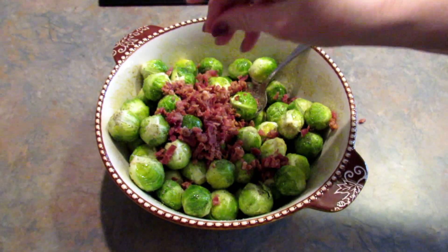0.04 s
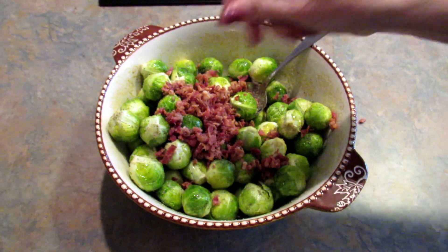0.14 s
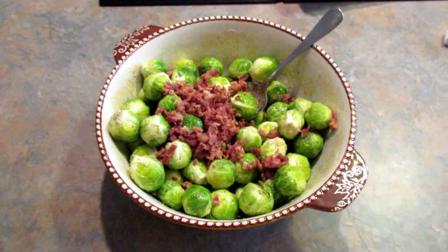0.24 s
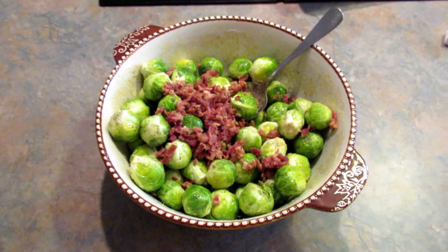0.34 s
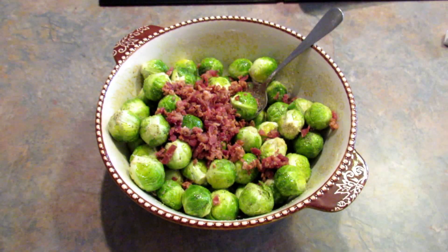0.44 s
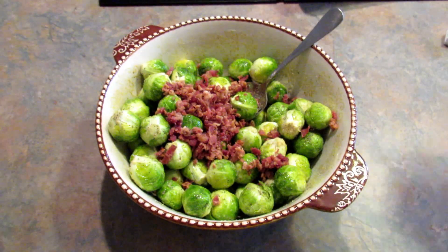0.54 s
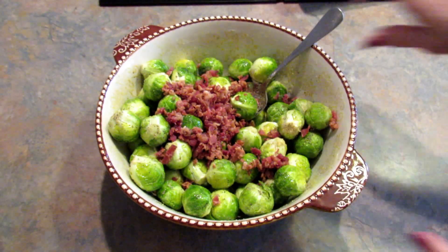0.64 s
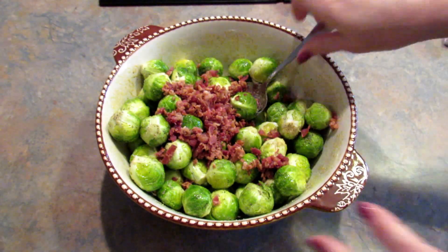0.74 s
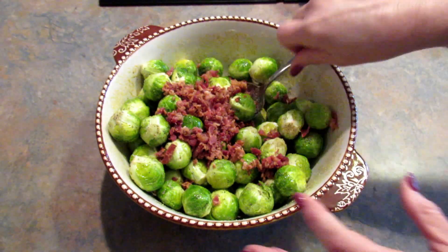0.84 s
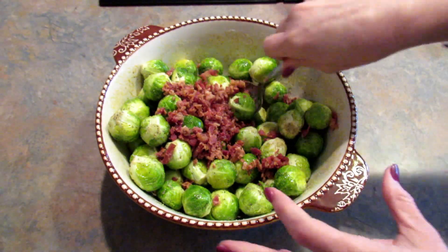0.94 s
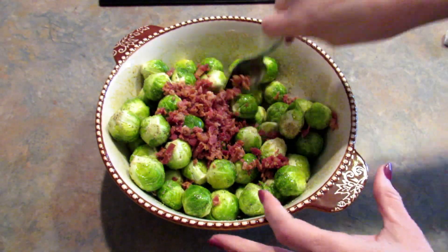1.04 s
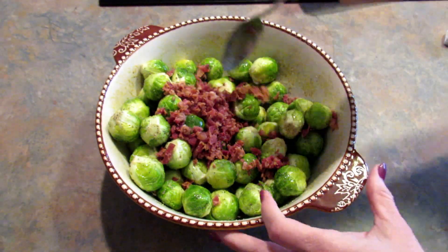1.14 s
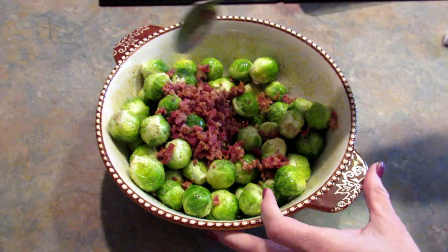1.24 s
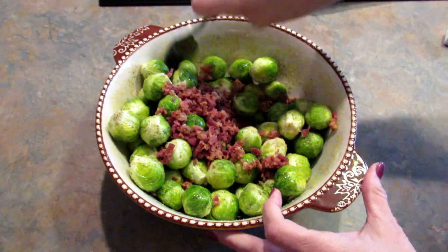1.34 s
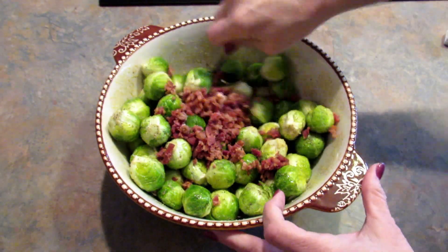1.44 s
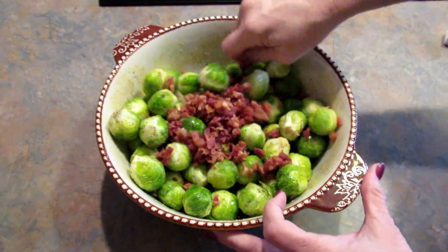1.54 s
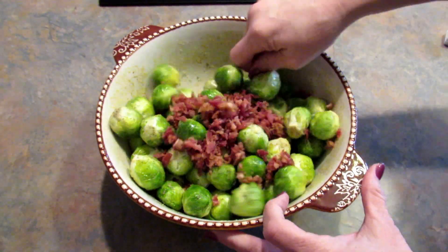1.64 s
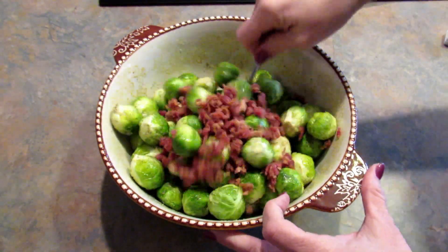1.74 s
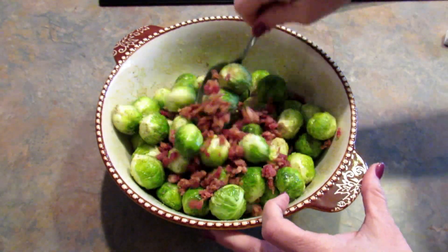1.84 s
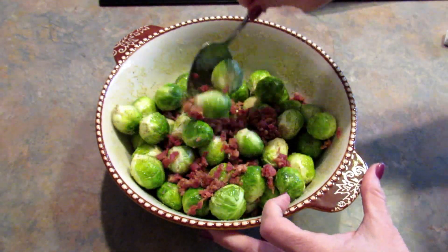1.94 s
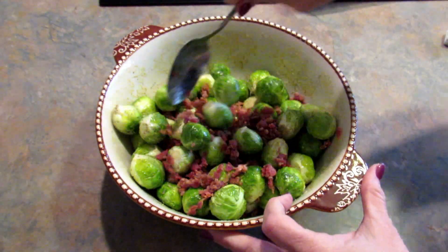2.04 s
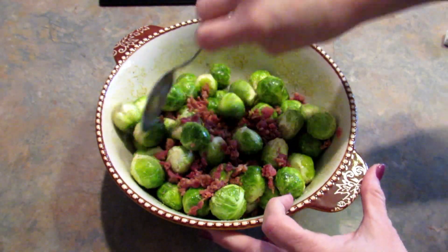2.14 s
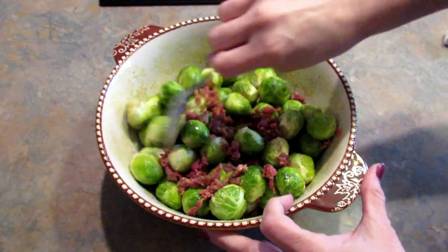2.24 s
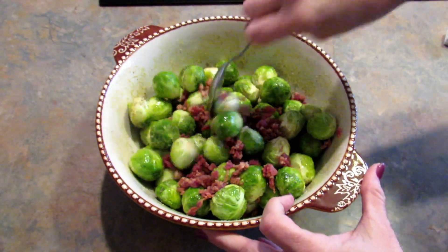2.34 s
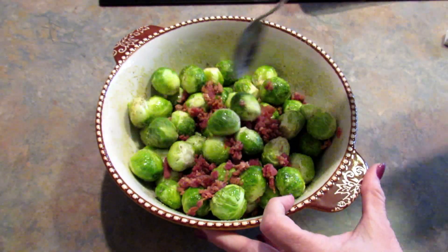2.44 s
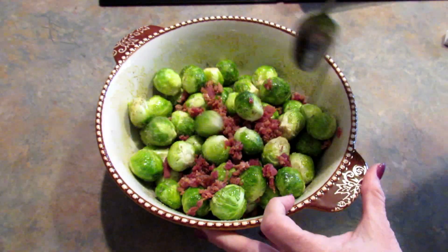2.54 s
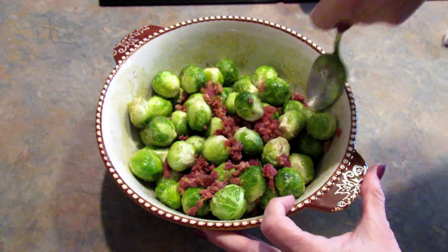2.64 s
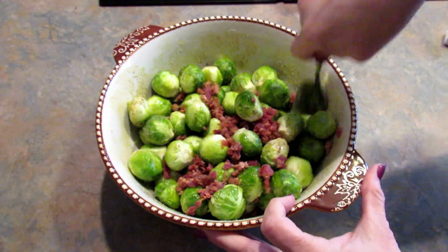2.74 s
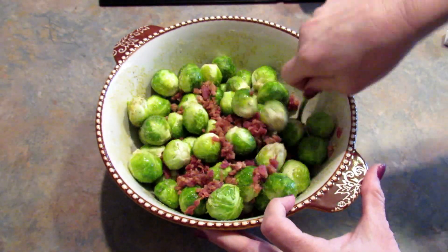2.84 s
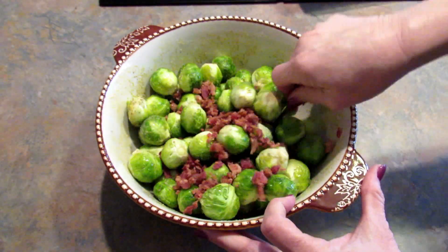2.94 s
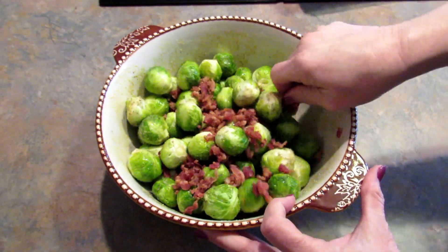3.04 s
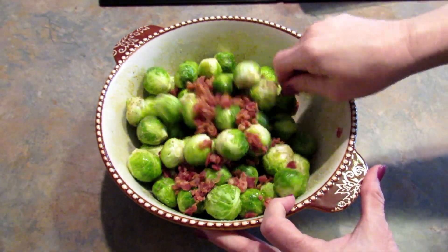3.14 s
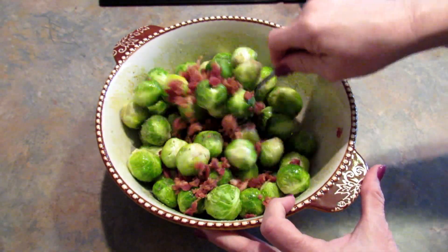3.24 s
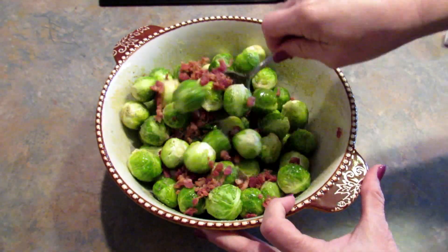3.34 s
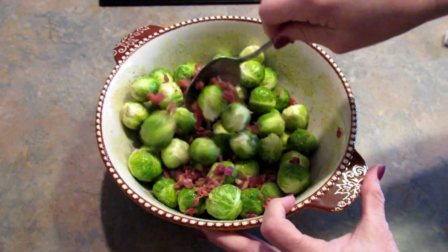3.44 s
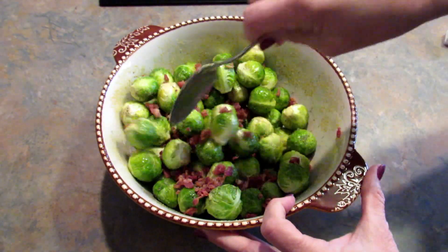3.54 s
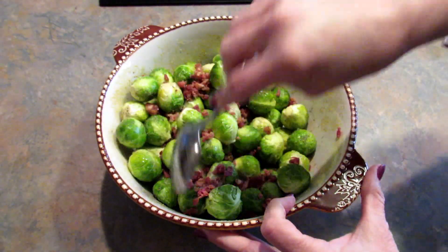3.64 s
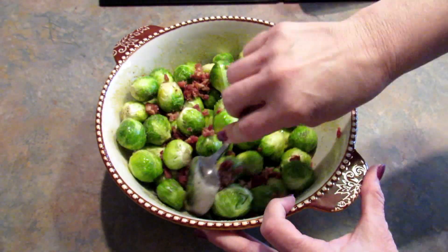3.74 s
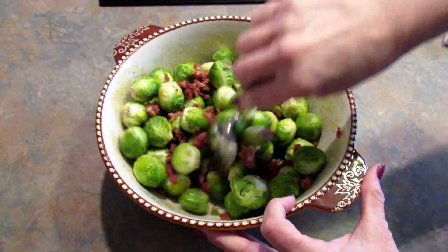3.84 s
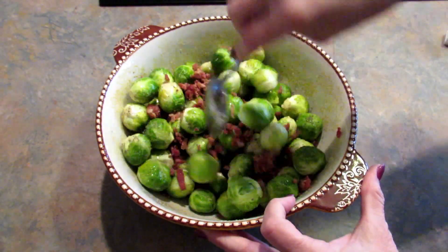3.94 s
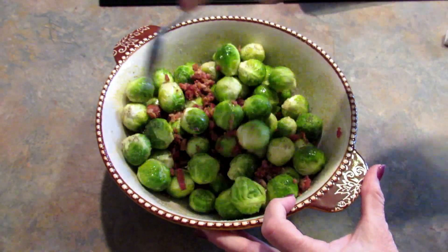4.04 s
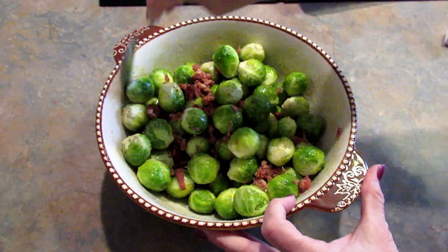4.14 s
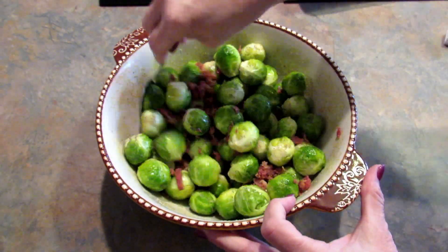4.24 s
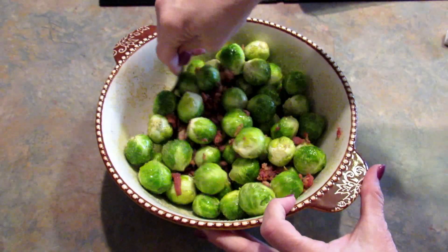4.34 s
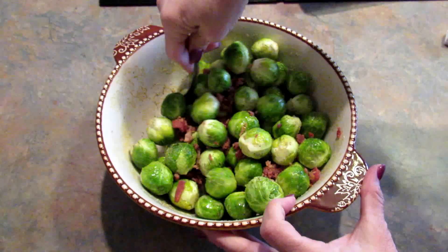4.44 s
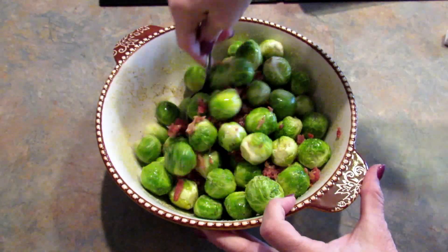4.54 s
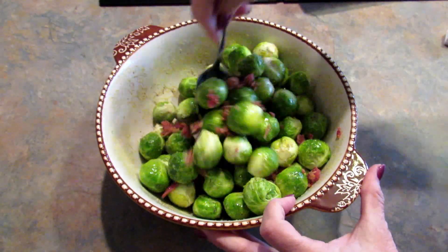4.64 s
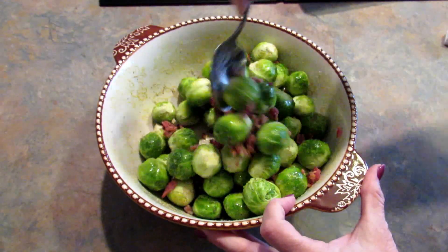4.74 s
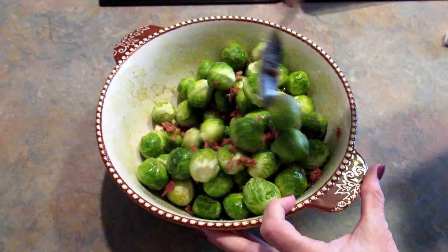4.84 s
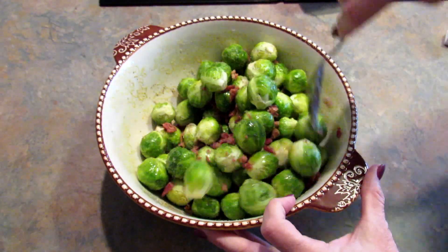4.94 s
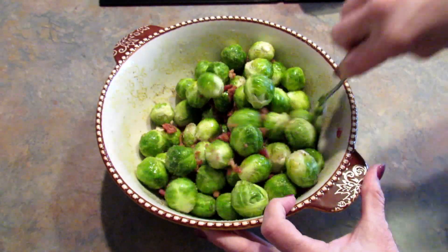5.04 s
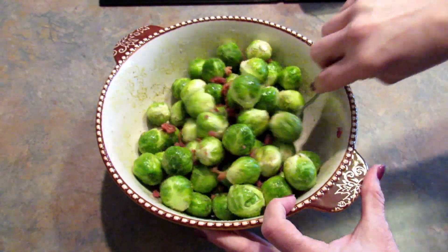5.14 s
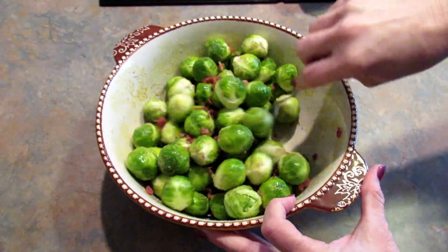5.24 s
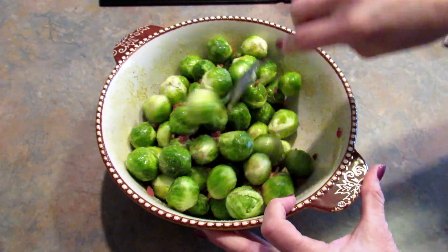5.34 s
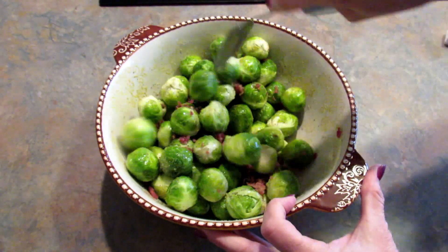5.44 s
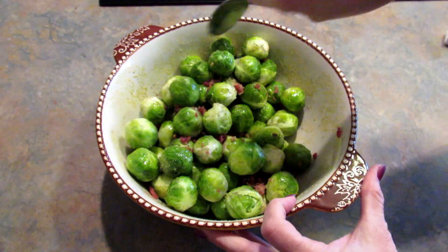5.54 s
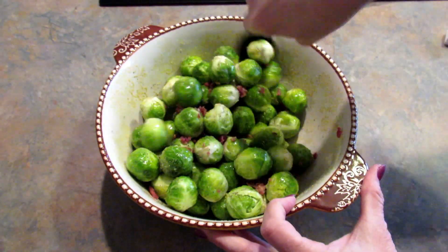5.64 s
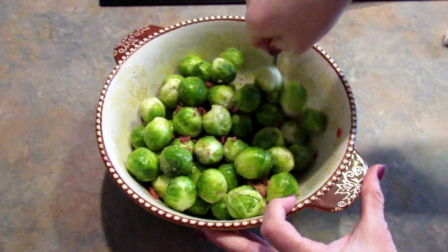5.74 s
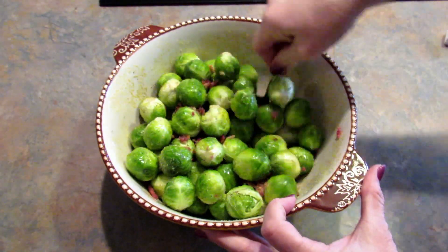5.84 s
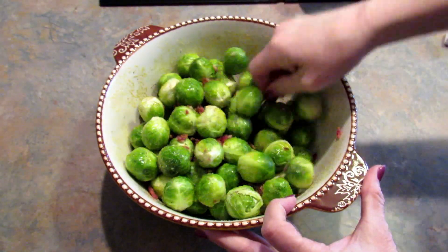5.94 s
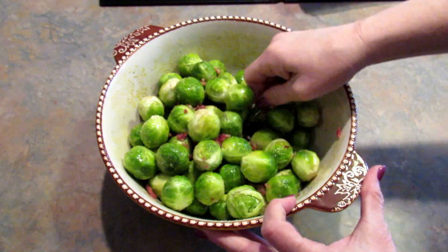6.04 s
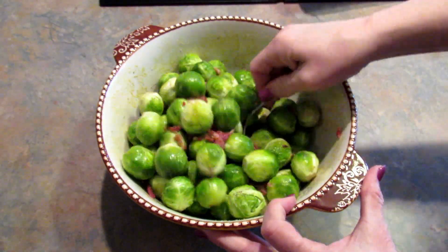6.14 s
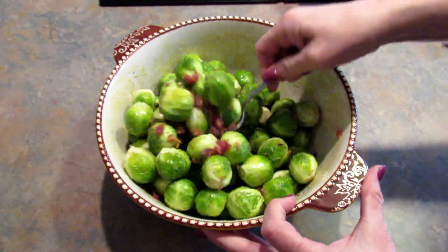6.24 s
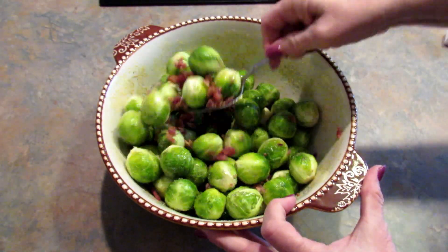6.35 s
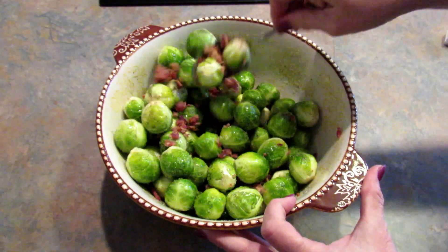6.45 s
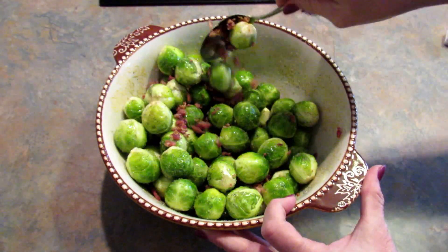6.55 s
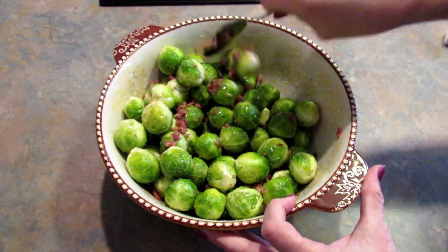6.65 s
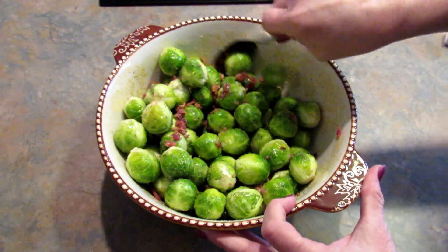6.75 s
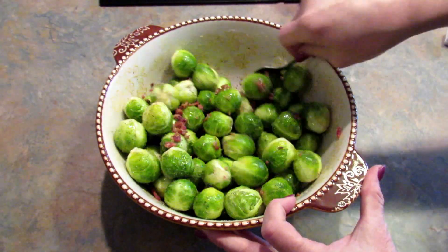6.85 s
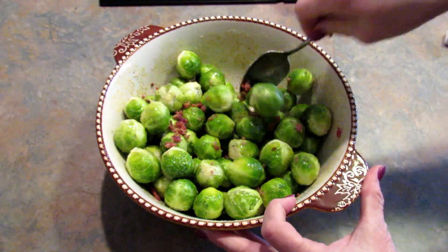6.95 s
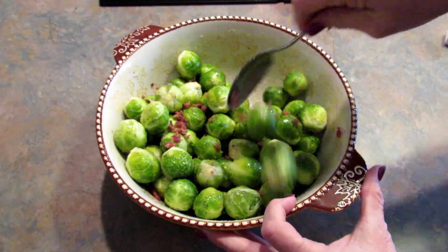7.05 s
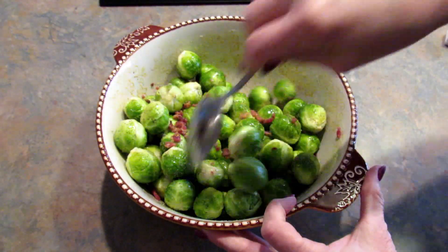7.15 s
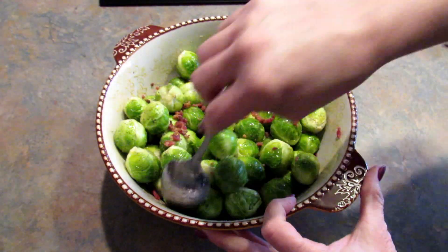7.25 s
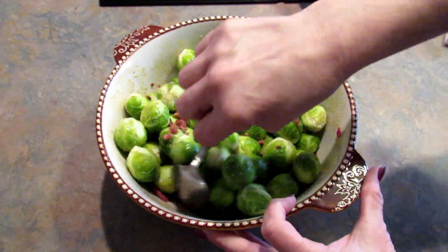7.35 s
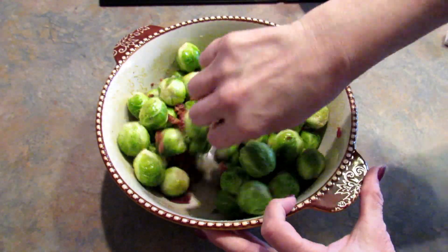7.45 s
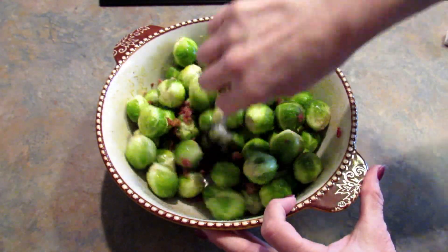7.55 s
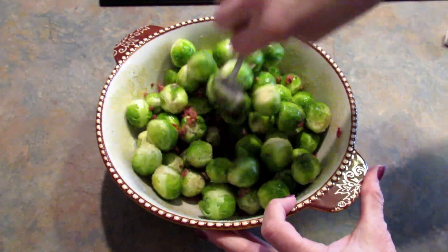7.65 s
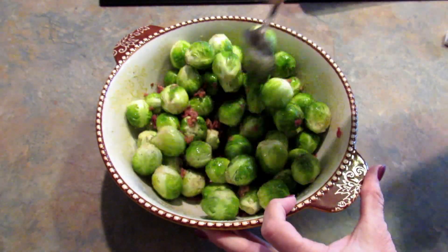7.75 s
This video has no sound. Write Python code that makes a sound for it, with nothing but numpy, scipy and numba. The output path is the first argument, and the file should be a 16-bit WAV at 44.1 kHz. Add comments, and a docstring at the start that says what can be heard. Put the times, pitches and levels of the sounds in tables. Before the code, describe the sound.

Close stereo sound in a small, lightly reverberant kitchen, with soft low room noise and a steady fridge hum. From 0 to 0.6 seconds, fingers brush faintly and an arm rustles; then it is nearly still until a soft knock at 1.0. From 1.3 to 2.2 a steel spoon digs in: two modest clinks, short gritty scrapes and a dense run of dull, low sprout knocks with small muffled ticks. A hard, bright clink rings at 2.6, followed by quick scrapes near 2.9. Tumbling thuds cluster at 3.3-3.6, with ringing clinks at 3.7 and 4.15 and a falling scrape at 4.3. Softer knocks follow, then clinks at 5.0, 5.6 and 5.8 among busy thumps and scrapes until 6.1. More knocks and a clink come at 6.5-6.7, another bright clink at 7.25, small scrapes at 7.4-7.5, and final soft thuds and damp leaf rustle near 7.6-7.8.

```python
"""On a kitchen counter, a steel spoon turns sprouts in a glazed ceramic bowl, close under a small stereo camera.
The spoon clinks, touches and scrapes: ringing modes of bowl and spoon, noisy cracks and buzz, stick-slip grit.
Sprouts tumble with dull knocks made of short low tones; damp leaves tick and rustle as random grains.
A fridge hums as sines over shaped room noise, and the camera's gain control ducks after loud blows."""
import sys
import numpy as np
from scipy import signal
from scipy.fft import rfft, irfft
from scipy.io import wavfile
from numba import njit

SR = 44100
rng = np.random.default_rng(int(sys.argv[2]) if len(sys.argv) > 2 else 0)


def log_audio(samples):
    """Write samples as a 16-bit WAV file to the path given in sys.argv[1]."""
    # one column per channel
    frames = np.atleast_2d(samples).T
    # limit to full scale, then quantise
    limited = np.clip(frames, -1, 1)
    pcm = np.round(limited * 32767).astype(np.int16)
    wavfile.write(sys.argv[1], SR, pcm)


N = 343098
T = np.arange(N) / SR
HZ = np.arange(N // 2 + 1) * SR / N + 1e-3  # the small offset avoids dividing by zero

# Levels of sound layers are taken before the layer gains set in the functions, and before record().
# Background noise of the room: pitch_hz, relative_density_db
ROOM_COLOUR = [(18, -35.5), (30, -16), (70, -8), (115, -2), (204, -2), (311, -16), (374, -2), (461, -12.5),
               (540, -8), (684, -24), (780, -15), (1460, -23), (3140, -30.5), (9220, -46), (16000, -41)]
# Drone in the room's resonances: pitch_hz, width_hz, level_db
ROOM_DRONE = [(117.8, 7.8, -58), (185.9, 6.8, -57.5), (241.1, 6.9, -53.5), (300, 63, -54.5),
              (356.5, 4.7, -58), (408.3, 3.7, -58), (539, 37, -65)]
# Fridge motor: pitch_hz, level_db
FRIDGE_TONES = [(60, -71), (120, -50.5), (180, -60), (240, -60.5), (360, -55.5)]
# How alike left and right are in the room noise: pitch_hz, correlation (0 to 1)
ROOM_LIKENESS = [(40, 0.12), (130, 0.7), (300, 0.67), (640, 0.4), (1400, 0.53), (3100, 1), (6800, 0.15),
                 (15000, .05)]
# Fingers brush off crumbs, the arm draws back: time_s, level_db
FINGER_BRUSH = [(0.04, -61), (0.048, -67), (0.068, -40.5), (0.144, -61), (0.238, -65), (0.436, -58.5),
                (0.55, -67)]
# A dull rustle while the arm draws back: time_s, level_db
ARM_RUSTLE = [(0.02, -60), (0.112, -69), (0.118, -84), (0.286, -57.5), (0.442, -65), (0.522, -85),
              (0.62, -73)]
# Damp leaves: time_s, level_db
LEAF_RUSTLE = [(.55, -65.5), (.97, -61.5), (1.4, -68), (1.66, -54), (2.0, -63), (2.6, -65), (3.1, -61.5),
               (3.9, -65), (4.2, -60.5), (5.0, -60), (5.55, -66), (5.95, -60), (6.2, -67), (6.8, -59),
               (7.0, -71), (7.3, -65), (7.66, -57.5), (7.78, -68)]
# Small knocks between the loud ones: time_s, level_db
SMALL_KNOCKS = [(1.0, -68), (1.36, -31.5), (1.51, -31.5), (1.89, -55), (2.3, -39), (3.3, -41.5),
                (3.49, -37), (3.93, -40.5), (4.27, -28.5), (4.4, -42), (4.93, -35), (5.65, -62.5),
                (5.93, -37.5), (6.12, -52.5), (6.57, -33.5), (6.87, -55), (7.06, -45.5), (7.78, -37.5)]
# Light touches muffled by the food: start_s, ring_peak_db, colour_hz, click_db
TOUCHES = [(1.001, -54, 1350, -47), (1.385, -35, 9300, -50), (1.453, -31, 9400, -52),
           (1.605, -33.5, 5540, -42), (1.606, -37, 8900, -45), (1.632, -55, 11000, -46),
           (1.643, -30, 5700, -41), (1.668, -40, 1030, -60), (1.682, -43, 1770, -51),
           (1.733, -39, 1050, -54), (1.826, -41, 1100, -43), (1.8573, -35, 2580, -52),
           (1.857, -36.5, 4140, -57), (1.858, -40, 7500, -55), (1.895, -33.5, 2600, -68),
           (1.908, -43, 8700, -53), (2.1023, -46, 2400, -53), (2.1325, -39, 1030, -48),
           (2.156, -50, 11400, -44), (2.188, -55, 8300, -49), (2.286, -41, 1160, -49.5),
           (2.345, -48, 9050, -52), (2.346, -46, 5700, -60), (3.254, -57, 1260, -48),
           (3.3086, -35.5, 2630, -45), (3.3547, -43.5, 1160, -45), (3.381, -54, 1170, -53),
           (3.694, -38, 1920, -36), (4.2775, -23.5, 1030, -46.5), (4.462, -40, 1316, -56),
           (4.473, -37.5, 1454, -58), (4.4939, -34, 1340, -49), (4.576, -48, 1000, -41),
           (4.6967, -43.5, 2080, -46), (4.774, -45.5, 1340, -48), (4.811, -43, 1580, -57.5),
           (4.864, -50, 1180, -54), (4.945, -43, 1440, -36.5), (5.464, -48.5, 1730, -47.5),
           (5.4862, -39, 1010, -54), (5.682, -28, 6640, -50), (5.985, -47, 1930, -48),
           (6.0256, -57, 980, -46), (6.4875, -44, 1930, -47), (7.093, -49.5, 1050, -54),
           (7.4288, -32, 1940, -48), (7.436, -30, 9400, -53), (7.6184, -61, 1190, -51),
           (7.651, -44, 4300, -36.5), (7.656, -45, 2600, -55)]
# Sprouts meeting the bowl: squash_start_s, level_db, pitch_hz, and beside the knock the bowl's
# lower_mode_db, upper_mode_db
SPROUT_KNOCKS = [(1.002, -28, 135, -15, -10), (1.322, -22, 414, -11, -11), (1.467, -23.5, 199, -4, -4),
                 (1.595, -22.5, 207, -8, -12), (1.629, -20, 239, -7, -15), (1.677, -32, 208, -16, -2),
                 (1.732, -15.5, 192, -7.5, -11.5), (1.76, -19, 242, -12, -13), (1.822, -20.5, 237, -2, -2),
                 (1.848, -22, 252, -9, -3.5), (1.885, -24.5, 135, -23, -11.5),
                 (2.131, -18.5, 230, -8, -7.5), (2.168, -27, 253, -4, -14), (2.411, -25, 125, -5, -8.5),
                 (2.575, -19, 415, -6.5, -9.5), (2.787, -28, 251.4, -4, -15),
                 (2.989, -27.5, 207, -6.5, -16), (3.049, -30, 191, -8, -9), (3.279, -32, 202, -8, -16),
                 (3.308, -20, 276, -14.5, -6), (3.336, -22.5, 164, -3, -9), (3.358, -20.5, 246, -5, -7),
                 (3.369, -25, 254, -9.5, -9), (3.393, -21.5, 255, -2, -16), (3.485, -25, 275, -13, -7),
                 (3.525, -27, 210, -9, -11), (3.547, -27, 190, -12, -14), (3.622, -24, 414, -5.5, -9),
                 (3.725, -26.5, 253, 0.5, -6), (4.15, -23, 396, -2, -10.5), (4.553, -27.5, 275, -8, -9),
                 (4.592, -30, 210, -6, -6), (4.639, -27.5, 220, -13, -3), (4.756, -28.5, 180, -10, -7.5),
                 (4.778, -29.5, 396, 1, -15), (4.813, -32.5, 221, -7, -14.5),
                 (4.865, -29.5, 139, -7.5, -20.5), (4.944, -25.5, 242, -8, -9),
                 (5.026, -26.5, 245, -0.5, -10.5), (5.462, -20.5, 264, -8, -6), (5.483, -18, 414, 1, -7.5),
                 (5.54, -23, 186, -20, -6), (5.574, -24.5, 400, -1, -5.5), (5.709, -30.5, 244, 6, -17),
                 (5.734, -22, 220, -3, -16), (5.779, -25.5, 210, -6, -14), (5.823, -25.5, 224, -2, -16),
                 (5.937, -23, 223.3, -10, -1.5), (5.985, -22.5, 245, -3, -1.5),
                 (6.027, -22.5, 248, 0, -9.5), (6.057, -32, 256, -2, -4), (6.091, -35.5, 260, -2, -10),
                 (6.44, -30.5, 402, -10.5, -3), (6.487, -18.5, 400, -4.5, 3), (6.509, -29, 365, -8, -10),
                 (6.69, -21, 388, -1.5, -9), (6.814, -25.5, 235, -3, -7), (6.844, -28.5, 243, -3, -8),
                 (6.891, -34, 196, -7, -5), (7.089, -27, 398, -7.5, -2), (7.257, -20.5, 240, -6, -4),
                 (7.56, -25.5, 234, -6, -1.5), (7.592, -27.5, 230, -4, -11), (7.616, -25, 223, -4, -8)]
# How long a knock of each pitch rings: pitch_hz, t60_s (time to fall by 60 dB)
KNOCK_DECAY = [(125, 0.072), (240, 0.043), (400, 0.097)]
# The loaded bowl's two low modes under every knock: pitch_hz, t60_s
BOWL_LOW_MODES = [(262, 0.16), (405, 0.11)]
# Spoon hitting the glaze: start_s, food_damping_t60_s, crack_db (at CRACK_MID_HZ), tilt_db_per_octave,
# bend_db_per_octave_squared, hollow_thock_db, treble_damping_power (no unit)
SPOON_CLINKS = [(1.323, 0.68, -27.5, -9.5, 1.5, -40, 0.27), (1.471, 0.33, -20.5, -5.5, 0.5, -27, .25),
                (2.576, 0.67, -9, 4, -3, -7.5, 0.65), (3.7234, 0.69, -14.5, 0, 1.5, -11.5, 0.34),
                (4.151, 0.63, -16, -1.5, 3, -28, 0.13), (5.0302, 0.41, -9.5, -1, -2, -38, 0.063),
                (5.5784, 0.67, -13, 2.5, 0, -1.5, 0.37), (5.8233, 0.41, -19, 0, -1.4, -39, 0.31),
                (6.6926, 0.41, -24, 8, 0.5, -4, 0.89), (7.257, 0.62, -12, 1, -1.5, -41, 0.18)]
# Modes of bowl and spoon together: pitch_hz
BOWL_MODE_HZ = [1030, 1250, 1460, 1692, 1745, 1879, 2600, 2649, 2936, 3020, 3720, 3795, 3830, 4140, 4245,
                4350, 5128, 5630, 5940, 6090, 6330, 6630, 7050, 7155, 7412, 8125, 8390, 9050, 9480, 10310,
                10550, 11560]
# The same modes one by one: relative_level_db under a touch or rub, t60_s
BOWL_MODE_RING = [(1, 0.51), (-20, 0.18), (-17, 0.33), (-11, 0.52), (-1.5, 1.1), (3.5, 1.3), (7, 0.72),
                  (-16, 0.68), (-11.5, 0.6), (-22.5, 0.47), (-20.5, 0.54), (-5.5, 0.62), (-20, 0.79),
                  (-9, 0.58), (-0.5, 0.79), (-20, 0.54), (-36, .8), (-7, 0.66), (-8, 0.48), (6, 1.1),
                  (-6, .6), (4, .6), (-5, .6), (5.5, 0.94), (-4, 0.5), (-9, .5), (-12, 0.35), (-6, 0.45),
                  (-7, .3), (-4, 0.34), (-4, 0.34), (-19, .3)]
# Each clink lands on its own spot. One row per clink, one column per mode: level_db
CLINK_MODE_DB = [(-29, -45, -45, -32, -32, -33, -34, -28, -35, -48, -43, -35, -41, -42, -43, -44, -41, -52, -50, -57, -49, -52, -54, -50, -47, -56, -57, -52, -58, -55, -63, -60),
                 (-45, -51, -49, -39, -41, -46, -34, -38, -45, -48, -44, -50, -51, -42, -37, -40, -56, -53, -47, -46, -48, -47, -49, -56, -52, -57, -56, -57, -63, -56, -62, -64),
                 (-32, -42, -43, -36, -29, -36, -41, -39, -32, -34, -48, -35, -38, -37, -38, -36, -32, -53, -47, -42, -43, -38, -37, -30, -35, -37, -44, -55, -50, -41, -45, -52),
                 (-33, -41, -39, -31, -35, -40, -45, -39, -27, -35, -31, -33, -28, -42, -34, -36, -33, -47, -35, -32, -46, -52, -50, -41, -44, -47, -39, -39, -53, -41, -54, -58),
                 (-36, -41, -42, -33, -31, -35, -34, -32, -49, -56, -35, -30, -34, -41, -37, -39, -41, -38, -34, -40, -49, -40, -39, -25, -43, -49, -39, -53, -45, -45, -41, -48),
                 (-48, -50, -42, -33, -38, -37, -46, -34, -41, -47, -42, -38, -40, -49, -42, -49, -42, -47, -44, -37, -54, -30, -40, -37, -45, -33, -44, -53, -48, -43, -45, -59),
                 (-31, -45, -43, -38, -36, -27, -32, -34, -40, -45, -34, -27, -32, -30, -33, -48, -43, -36, -38, -42, -45, -36, -36, -24, -44, -45, -36, -45, -47, -48, -42, -55),
                 (-54, -53, -54, -47, -44, -34, -38, -42, -61, -58, -51, -54, -55, -54, -57, -56, -61, -63, -56, -61, -51, -56, -51, -50, -60, -63, -65, -66, -60, -64, -67, -68),
                 (-36, -41, -46, -39, -34, -27, -48, -40, -62, -53, -51, -41, -43, -41, -41, -48, -43, -49, -41, -52, -44, -45, -49, -46, -52, -57, -56, -56, -52, -60, -50, -56),
                 (-34, -38, -36, -32, -42, -31, -44, -40, -34, -44, -33, -22, -22, -44, -36, -40, -33, -46, -37, -33, -41, -47, -54, -33, -43, -51, -29, -49, -55, -42, -46, -49)]
# Families of modes that the clinks' buzz gathers round: pitch_hz
BUZZ_FAMILY_HZ = [1030, 1250, 1460, 1696, 1879, 2630, 2936, 3790, 4140, 4245, 5128, 5630, 5940, 6090, 6630,
                  7130, 7412, 8135, 8390, 9050, 9480, 10400, 11560, 13000]
# Buzz of each clink. One row per clink, one column per family: level_db
CLINK_BUZZ_DB = [(-20, -60, -52, -29, -36, -26, -34, -21, -61, -34, -37, -53, -54, -56, -52, -54, -56, -56, -57, -55, -57, -45, -50, -53),
                 (-30, -56, -62, -26, -30, -24.5, -42, -59, -21, -15, -49, -54, -57, -43.5, -40, -42, -48, -31, -43, -49, -38, -52, -58, -47),
                 (-26, -25, -35, -20, -38, -40, -22.5, -21.5, -33, -19, -43.5, -49, -35, -40, -26.5, -30, -14, -25, -31, -31, -34, -23, -35, -34.5),
                 (-24.5, -27, -20.5, -13, -39, -28, -26, -16, -21.5, -30, -45.5, -49, -22, -24, -33, -32, -35.5, -22.5, -33.5, -29, -29, -29.5, -32.5, -34),
                 (-14, -25.5, -31, -34, -32, -27.5, -46, -13, -18.5, -26, -31, -34, -12, -28, -34, -22, -30, -33, -32, -29.5, -17.5, -25, -26.5, -29),
                 (-37, -48.5, -34.5, -28, -42, -47, -39, -27.5, -43, -41, -43.5, -49, -28, -25, -25, -29, -43, -12, -23, -53, -24.5, -29, -25, -24.5),
                 (-23.5, -40, -34.5, -38.5, -34, -26, -30.5, -17.5, -16.5, -33.5, -53, -20, -15.5, -29.5, -18, -24, -13, -28.5, -25.5, -31.5, -20, -25, -29.5, -22.5),
                 (-68, -54, -53, -39, -53, -28, -89, -45, -57, -62, -67, -67, -61, -61, -61, -42, -63, -62, -58, -64, -34, -39, -57, -58),
                 (-31, -46, -37, -42, -30, -40, -57, -28.5, -20, -36, -42, -30, -28, -30, -22, -25, -22, -31, -46, -35, -24, -36, -30.5, -48),
                 (-16.5, -16.5, -20, -15, -33.5, -36, -33, -18, -39.5, -35, -45, -36, -20, -19, -28, -21, -29, -34, -18.5, -28, -21, -26, -29, -32)]
# Spoon sliding on the glaze: start_s, length_s, level_db, squeak_start_hz, squeak_end_hz,
# dragged_leaves_db, upper_colour_hz, upper_colour_db (beside the squeak)
SPOON_SCRAPES = [(1.36, 0.06, -40, 3806, 4110, -48, 6950, -5),
                 (1.44, 0.016, -29, 4030, 4150, -49, 6500, -3),
                 (1.48, 0.043, -38, 2600, 4200, -52, 6100, -2),
                 (2.22, 0.061, -45.5, 3020, 1516, -53, 8300, -28),
                 (2.78, 0.039, -36.5, 4023, 4100, -50, 6350, -15),
                 (2.85, 0.061, -38.5, 1923, 2010, -57, 3934, 0),
                 (2.9, 0.027, -45, 1797, 1994, -50, 3680, 2.5),
                 (2.93, 0.048, -45.5, 2183, 2610, -68, 4240, -4),
                 (4.26, 0.15, -45, 4120, 2490, -59, 6000, -6.5),
                 (5.13, 0.015, -35.5, 1804, 1800, -67, 4290, -18),
                 (5.72, 0.078, -39, 3530, 3870, -49, 6600, -8),
                 (5.835, 0.063, -39.5, 1875, 1912, -63, 2620, -7),
                 (5.92, 0.022, -39.5, 2300, 2360, -73, 4100, -15),
                 (6.92, 0.012, -54, 2040, 2050, -78, 4170, -8),
                 (7.421, 0.014, -34, 1886, 2060, -45, 3305, 2),
                 (7.44, 0.026, -47, 2185, 2635, -56, 4380, -3),
                 (7.5, 0.031, -54, 2636, 3300, -76, 6000, -18)]
# Unequal microphone ports: pitch_hz, left_minus_right_db
PORT_BALANCE = [(30, 4), (60, -2.5), (150, -2.5), (450, -2.5), (1000, -0.5), (2500, -0.4), (6000, 0),
                (13000, 0)]
# Timing between the ports: pitch_hz, left_lead_radians
PORT_LEAD = [(200, 0.35), (700, 0.4), (1700, 0.21), (4000, -0.38), (7000, -0.066), (10000, -0.34),
             (14000, -0.41)]

ROOM_DB = -42.5
ROOM_SWELL_DB, ROOM_SWELL_S = 1.2, 0.09  # the middle of the room noise wavers
TICK_SPREAD_OCTAVES, TICK_T60_S = .16, 0.025  # range of modes a touch wakes, and its damping
CRACK_MID_HZ = 4000
CLUSTER_WIDTH = .024  # the buzz crowds round each mode: width as a share of its pitch
BETWEEN_DB = -11  # buzz in the gaps between modes
SMOOTH_HZ = 11000  # above this the buzz becomes a spray without clusters
THOCK_HZ, THOCK_T60_S = 1250, 0.0061
LET_GO_T60_S, STUTTER_DB, STUTTER_S = 0.12, 3.5, 0.013
ECHO_DB, ECHO_T60_S, ECHO_TOP_T60_S = 1.5, 0.54, 0.21
EARLY_DB, EARLY_T60_S = 10.5, 0.05
ECHO_LIKENESS, ECHO_TOP_LIKENESS = 0.98, 0.16  # how alike the two channels are
COUNTER_S, COUNTER_GAIN, COUNTER_TOP_HZ = .00072, 0.34, 1480  # reflection off the counter
TOP_HZ = 16300


def undb(db):
    """Turn decibels into gain."""
    return 10 ** (np.asarray(db) / 20)


def level(x, db):
    """Scale a sound to an rms level (its average strength)."""
    return x * undb(db) / np.sqrt(np.mean(x ** 2))


def on_log(table, hz):
    """Read (pitch, value) rows on a log-pitch axis."""
    at, value = np.transpose(table)
    return np.interp(np.log(hz), np.log(at), value)


def fade(t, t60):
    """Exponential decay that falls 60 dB in t60 seconds."""
    return np.exp(-np.log(1000) * t / np.maximum(t60, .004))


def peak(hz, width):
    """Frequency response of one resonance."""
    return 1 / (1 + 1j * (HZ / hz - hz / HZ) * hz / width)


def filtered(x, response):
    """Shape a sound by a frequency response."""
    return irfft(rfft(x) * response, N)


def add(out, s, sound):
    """Mix a sound in at a time."""
    i = int(s * SR)
    out[i:i + len(sound)] += sound[:N - i]


def grains(per_s, scatter_db):
    """Random clicks of unequal size."""
    size_db = scatter_db * np.minimum(rng.exponential(size=N), 2)
    return (rng.random(N) < per_s / SR) * rng.standard_normal(N) * undb(size_db)


def curve(rows, outside=None):
    """Draw straight lines through (time, value) rows."""
    at, value = np.transpose(rows)
    return np.interp(T, at, value, outside, outside)


def wander(count, step_s):
    """A random line with a new target every step."""
    return np.interp(T / step_s, np.arange(count), rng.standard_normal(count))


def kitchen():
    """Room noise, room resonances and fridge hum; the noise is partly alike in both channels."""
    mid, side = rfft(rng.standard_normal((2, N)))
    like = on_log(ROOM_LIKENESS, HZ)
    pair = mid * np.sqrt(1 + like) + side * np.sqrt(1 - like) * np.array([[1], [-1]])
    out = level(irfft(pair * undb(on_log(ROOM_COLOUR, HZ)), N), ROOM_DB)
    middle = filtered(out, peak(1400.0, 2200.))
    out += middle * (undb(ROOM_SWELL_DB * wander(200, ROOM_SWELL_S)) - 1)
    for hz, db in FRIDGE_TONES:
        out += level(np.sin(2 * np.pi * (hz * T + rng.random())), db)
    for hz, width, db in ROOM_DRONE:
        out += level(irfft(pair * peak(hz, width) ** 2, N), db)
    return out


def strokes(column):
    """The strength of each slide swells as it grips, stutters and lets go."""
    out = np.zeros(N)
    for row in SPOON_SCRAPES:
        start_s, length_s = row[:2]
        t = T - start_s
        grip = np.clip(t / length_s, 0, 1) ** 0.46
        out += undb(row[column]) * grip * fade(np.maximum(t - length_s, 0), LET_GO_T60_S)
    return out * undb(STUTTER_DB * wander(1000, STUTTER_S))


def rustle(pops_db=-14):
    """Rubbing leaves and fingers make dense bright grains with sparse moist pops; the arm rustles duller."""
    bright = peak(7340.0, 7800.0) ** 2
    leaves = level(filtered(grains(11000, 1.9), bright), -4.5)
    leaves += level(filtered(grains(40, 2.5), bright), pops_db)
    dull = level(filtered(grains(4000, 2.5), peak(1700., 2000.)), -1.9)
    dull *= undb(curve(ARM_RUSTLE, outside=-120))
    strength = undb(curve(LEAF_RUSTLE, outside=-120)) + undb(curve(FINGER_BRUSH, outside=-120))
    strength += strokes(column=5)  # leaves dragged along by the spoon
    return dull + leaves * strength


def ring(mode_db, t, damp_t60, slope=0.23, waver=0.85, waver_s=.012):
    """All modes struck at once; shifting food damps the wall and makes each mode waver, high ones faster."""
    hz, t60 = np.array(BOWL_MODE_HZ)[:, None], np.array(BOWL_MODE_RING)[:, 1:]
    sign = np.sign(rng.standard_normal((len(hz), 1)))
    steps = rng.standard_normal((2, len(hz), 128))
    clock = t / waver_s * (hz / 2000) ** 0.97  # waver_s is the step at 2000 Hz
    drift = np.array([[np.interp(c, np.arange(len(row)), row) for c, row in zip(clock, part)]
                      for part in steps])
    unrest = waver * (1 - fade(t, .03))  # steady at the blow, then restless
    wave = (1 + unrest * drift[0]) * np.sin(2 * np.pi * hz * t)
    wave += unrest * drift[1] * np.cos(2 * np.pi * hz * t)
    decay = fade(t, t60) * fade(t, damp_t60 * (hz / 3000) ** -slope)
    return np.sum(sign * undb(mode_db)[:, None] * decay * wave, axis=0)


def ticks(click_t60=0.016):
    """A light touch briefly rings the modes near its colour, over a moist click."""
    out, t = np.zeros(N), T[:SR // 5]
    muffled_db = 0.3 * np.array(BOWL_MODE_RING)[:, 0]  # the food evens out strong and weak modes
    for s, db, colour_hz, click_db in TOUCHES:
        distance = np.log2(np.divide(BOWL_MODE_HZ, colour_hz)) / TICK_SPREAD_OCTAVES
        tone = ring(muffled_db - 12 * distance ** 2, t, TICK_T60_S)
        click = np.diff(rng.standard_normal(len(t) + 1)) * fade(t, click_t60)
        add(out, s, undb(db) * tone / np.abs(tone).max() + undb(click_db) * click)
    return out


def knocks(wall_db=-6, second=1.282, squash_s=0.00203, slap_db=-11):
    """A soft ball squashes, then knocks the wall: a few low cycles, an upper tone and a dull slap."""
    out, t = np.zeros(N), T[:SR // 5]
    dull = signal.butter(2, [180, 600], "band", fs=SR, output="sos")
    for s, db, hz, *low_db in SPROUT_KNOCKS:
        body = np.sin(2 * np.pi * hz * t)
        body += undb(wall_db) * np.sin(2 * np.pi * second * hz * t) * fade(t, 0.48)
        low = sum(undb(mode_db) * np.sin(2 * np.pi * mode_hz * t) * fade(t, t60)
                  for (mode_hz, t60), mode_db in zip(BOWL_LOW_MODES, low_db))
        slap = level(signal.sosfilt(dull, rng.standard_normal(len(t))), slap_db) * fade(t, 0.03)
        soft_start = 1 - fade(t, 0.014)
        hit = (body * fade(t, on_log(KNOCK_DECAY, hz)) + low + slap) * soft_start
        add(out, s + squash_s, -undb(db) * hit)
    # many small knocks: random grains through the bowl's low resonances
    shape = peak(232.0, 90.) + undb(-4.5) * peak(397.0, 59.0) + undb(13.0) * peak(100.0, 69.0)
    small = level(filtered(grains(160, 4.7), shape * peak(280.0, 380.0) ** 3), -6.5)
    small *= undb(curve(SMALL_KNOCKS, outside=-86))
    return signal.sosfilt(signal.butter(2, 70, "high", fs=SR, output="sos"), out + small)


def clinks(ring_db=-0.5, crack_db=6, snap_t60=0.014, buzz_db=3, buzz_t60=0.9, early_db=4, early_t60=0.047):
    """A hard hit rings the modes, with a broad snap and a buzz of dense weak modes; early energy goes fast."""
    tones, noises, t = np.zeros(N), np.zeros(N), T[:SR // 2]
    f = np.arange(1, len(t) // 2 + 2) * SR / len(t)
    low_cut = 1 / (1 + (740.0 / f) ** 5)
    clusters = [np.exp(-(np.log(f / hz) / CLUSTER_WIDTH) ** 2) for hz in BOWL_MODE_HZ]
    crowd = undb(BETWEEN_DB) + np.max(clusters, axis=0)
    smooth = 1 / (1 + (SMOOTH_HZ / f) ** 6)
    crowd = crowd * (1 - smooth) + 0.42 * smooth
    octave = np.log2(np.clip(f, 1200, 12500) / CRACK_MID_HZ)
    early = 1 + undb(early_db) * fade(t, early_t60)
    for row, mode_db, family_db in zip(SPOON_CLINKS, CLINK_MODE_DB, CLINK_BUZZ_DB):
        s, damp_t60, snap_db, tilt, bend, _, slope = row
        snap, dense = rfft(rng.standard_normal((2, len(t)))) * low_cut
        snap_colour = undb(snap_db + tilt * octave + bend * octave ** 2)
        crack = irfft(snap * snap_colour, len(t)) * fade(t, snap_t60)
        buzz_colour = crowd * undb(on_log(list(zip(BUZZ_FAMILY_HZ, family_db)), f))
        buzz = irfft(dense * buzz_colour, len(t)) * fade(t, buzz_t60) * fade(t, damp_t60)
        add(tones, s, undb(ring_db) * ring(mode_db, t, damp_t60, slope) * early)
        add(noises, s, undb(buzz_db) * buzz * early + undb(crack_db) * crack)
    return tones, noises


def thocks():
    """Under each clink the full bowl gives a short hollow note."""
    out, t = np.zeros(N), T[:SR // 10]
    for row in SPOON_CLINKS:
        add(out, row[0], undb(row[-2]) * np.sin(2 * np.pi * THOCK_HZ * t) * fade(t, THOCK_T60_S))
    return signal.sosfilt(signal.butter(2, 650, "high", fs=SR, output="sos"), out)


def slide_curve(start_column, end_column):
    """Glide a setting through each slide, then hold it until the next slide starts."""
    until = [row[0] - .001 for row in SPOON_SCRAPES[1:]] + [T[-1]]
    points = []
    for row, stop in zip(SPOON_SCRAPES, until):
        points.append((row[0], row[start_column]))
        points.append((min(row[0] + row[1], stop), row[end_column]))
        points.append((stop, row[end_column]))
    return curve(points)


def scrapes(widen=52.0, hiss_db=-14, spread=0.49, shift_db=4, shift_s=0.026, rub_db=-9, rub_hz=141.0,
            octave_db=-8, judder_db=2, judder_s=0.0028):
    """Stick-slip grit drives damped modes near two colours; each comes and goes as the contact moves."""
    grit = rfft(grains(3200, 4))
    squeak_hz, upper_hz, upper_db = slide_curve(3, 4), slide_curve(6, 6), slide_curve(7, 7)

    def near(hz, at_hz):
        """Modes close in pitch to the colour are driven harder."""
        return undb(np.maximum(-8 * (np.log2(hz / at_hz) / spread) ** 2, -22))

    out = level(irfft(grit * peak(7200.0, 9000.), N), hiss_db)
    for hz, (db, t60) in zip(BOWL_MODE_HZ, BOWL_MODE_RING):
        shift = undb(shift_db * wander(800, shift_s))
        drive = (near(hz, squeak_hz) + undb(upper_db) * near(hz, upper_hz)) * shift
        out += level(irfft(grit * peak(hz, widen / np.sqrt(t60)), N), db - 20.0) * drive
    # the rub itself: a grainy band that glides with each colour and with the squeak's octave
    bands = ((squeak_hz, rub_db), (upper_hz, rub_db + upper_db), (2 * squeak_hz, rub_db + octave_db))
    for at_hz, db in bands:
        slow = filtered([grains(1500, 3), grains(1500, 3)], 1 / (1 + (HZ / rub_hz) ** 2))
        turn = 2 * np.pi * np.cumsum(at_hz) / SR
        out += level(slow[0] * np.sin(turn) + slow[1] * np.cos(turn), 0) * undb(db)
    judder = undb(judder_db * wander(4000, judder_s))  # the spoon catches and slips unevenly
    return out * strokes(column=2) * judder


def echo(x):
    """Bowl, counter and walls: early scatter and a decaying wash; the treble is shorter and wider."""
    t = T[:SR // 2]
    noise = rng.standard_normal((3, len(t)))
    low = signal.sosfiltfilt(signal.butter(3, 7000, fs=SR, output="sos"), noise)
    parts = ((low, ECHO_T60_S, ECHO_LIKENESS), (noise - low, ECHO_TOP_T60_S, ECHO_TOP_LIKENESS))
    wash = 0
    for part, t60, like in parts:
        # one shared noise plus one separate noise for each channel
        wash = wash + (np.sqrt(like) * part[0] + np.sqrt(1 - like) * part[1:]) * fade(t, t60)
    wash *= 1 + undb(EARLY_DB) * fade(t, EARLY_T60_S)
    wash *= undb(ECHO_DB) / np.sqrt(np.sum(wash ** 2) / 2)
    return signal.fftconvolve(x[None], wash, axes=1)[:, :N]


def scene(low_echo_db=-5, ring_echo_db=-9):
    """The bowl sounds directly and by way of the room; everything also bounces off the counter."""
    tones, noises = clinks()
    tones = tones + ticks()
    bright = noises + rustle() + scrapes()
    dull = knocks() + thocks()
    # low knocks go into the counter more than into the room; the ring beams up out of the bowl
    room = echo(bright + undb(low_echo_db) * dull + undb(ring_echo_db) * tones)
    delay = np.exp(-2j * np.pi * HZ * COUNTER_S)
    bounce = COUNTER_GAIN * delay / (1 + (HZ / COUNTER_TOP_HZ) ** 4)
    return filtered(tones + bright + dull + room + kitchen(), 1 + bounce)


@njit
def follow(x, attack, release):
    """Track loudness, rising fast and falling slowly."""
    y, e = np.empty(len(x)), 0.
    for i in range(len(x)):
        e += (x[i] - e) * (attack if x[i] > e else release)
        y[i] = e
    return y


def record(dry, knee_db=-16, squeeze=0.44, attack_s=0.0048, release_s=0.54, dull_hz=15300):
    """Unequal ports, gain control that recovers slowly, soft clipping, cut bass and top."""
    side = np.array([[1], [-1]]) / 2
    ports = undb(on_log(PORT_BALANCE, HZ) * side) * np.exp(1j * on_log(PORT_LEAD, HZ) * side)
    x = filtered(dry, ports / (1 + (HZ / dull_hz) ** 10))
    loudness = follow(np.abs(x).max(axis=0), 1 / (attack_s * SR), 1 / (release_s * SR))
    x = x * (1 + loudness / undb(knee_db)) ** -squeeze
    x = signal.sosfilt(signal.butter(2, 40, "high", fs=SR, output="sos"), x)
    x = .97 * np.tanh(x / .97)
    return signal.sosfilt(signal.ellip(10, .2, 95, TOP_HZ, fs=SR, output="sos"), x)


dry = scene()
out = record(dry)
log_audio(out)
```